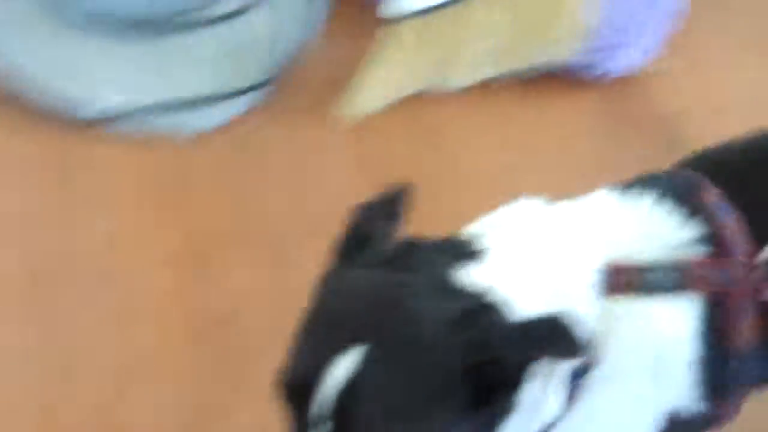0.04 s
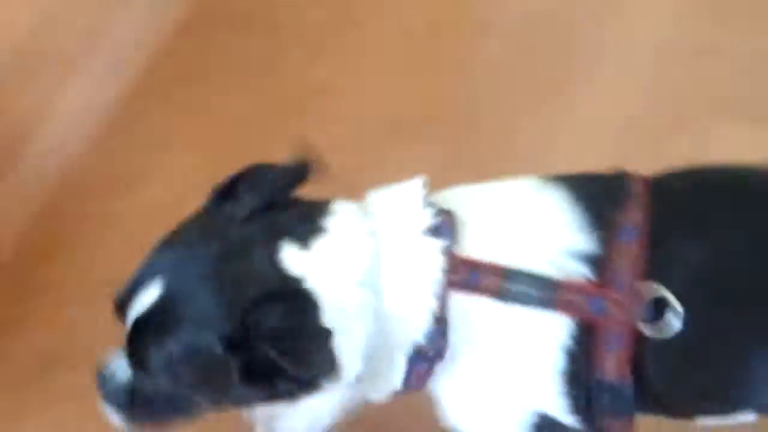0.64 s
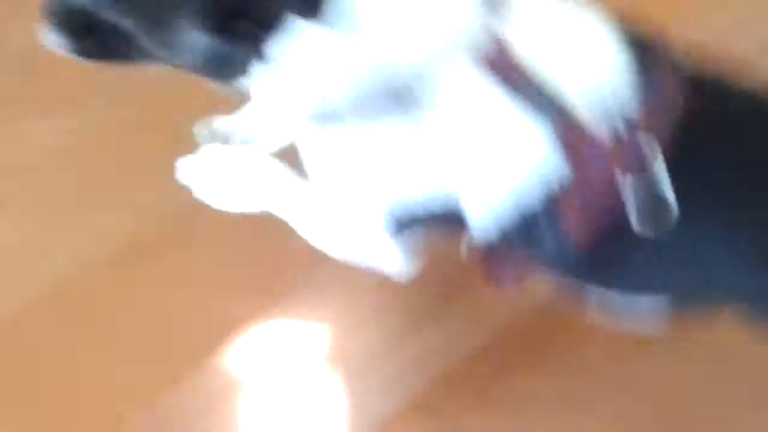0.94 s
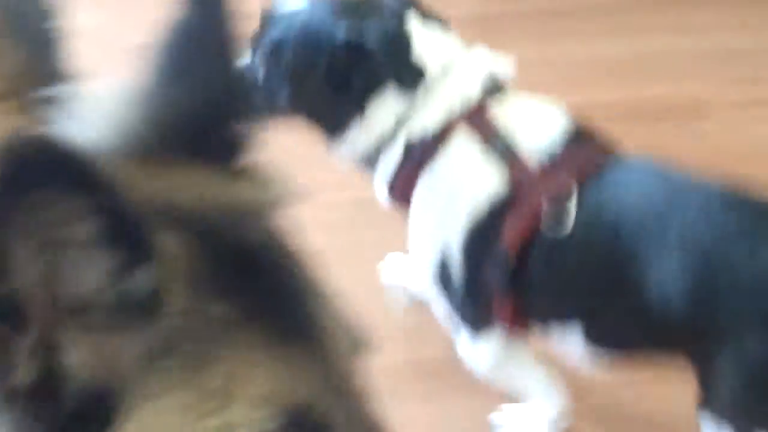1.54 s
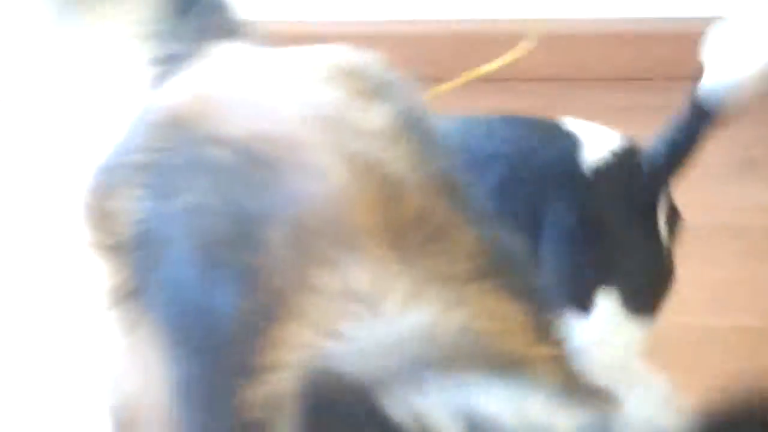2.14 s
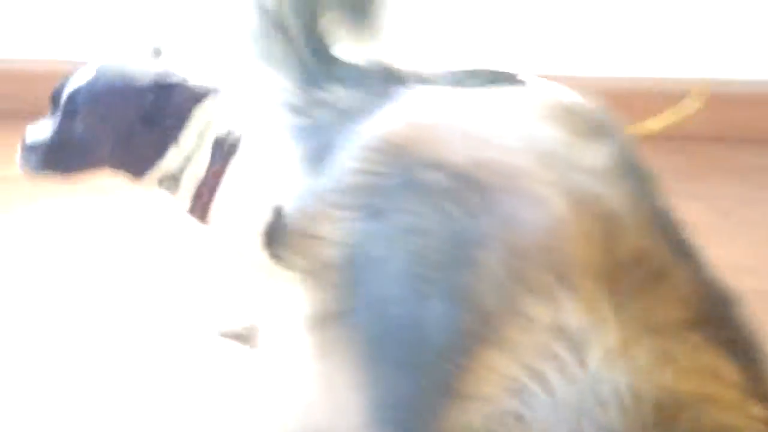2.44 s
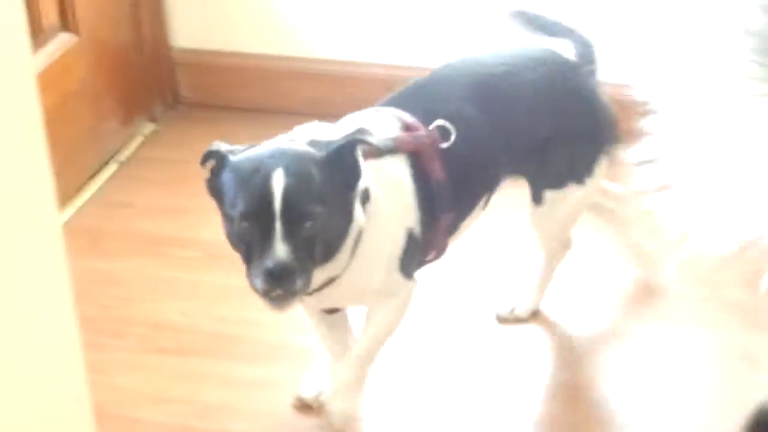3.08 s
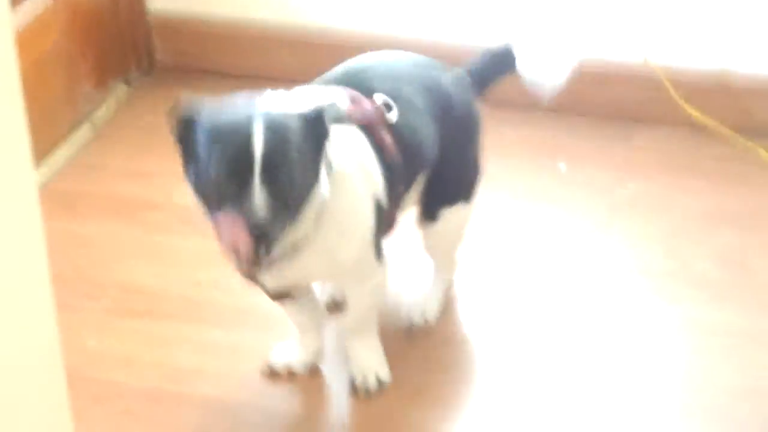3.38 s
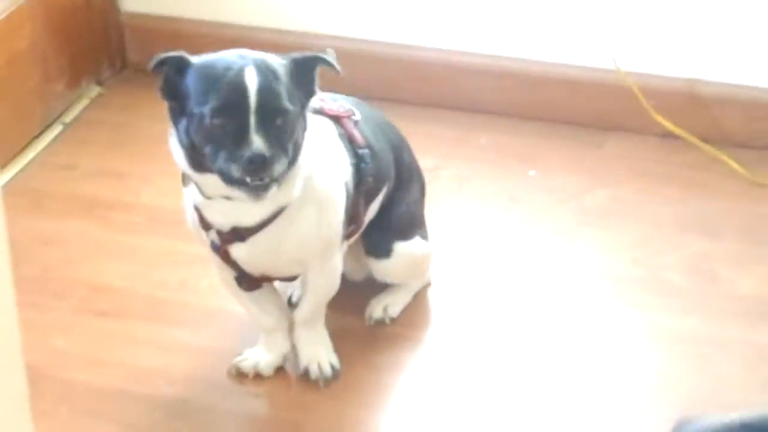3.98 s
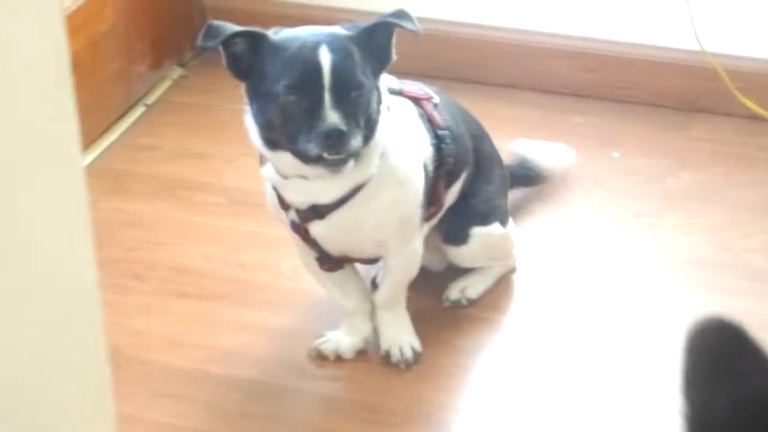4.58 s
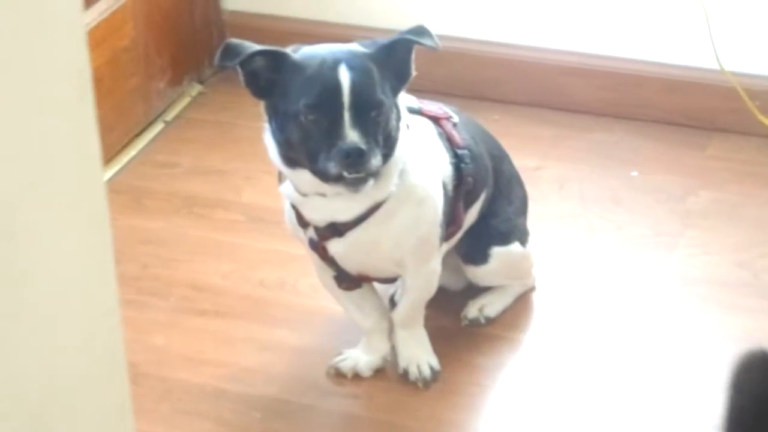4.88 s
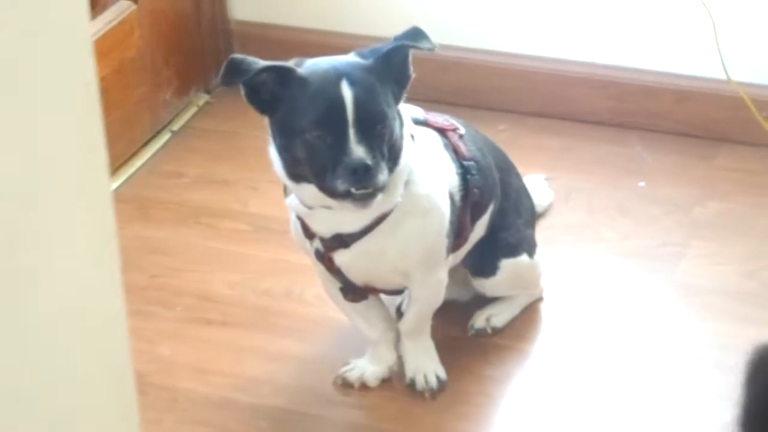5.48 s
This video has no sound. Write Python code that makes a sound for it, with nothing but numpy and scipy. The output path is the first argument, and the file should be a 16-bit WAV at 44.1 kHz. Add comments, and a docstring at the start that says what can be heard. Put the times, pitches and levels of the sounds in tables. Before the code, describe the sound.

Quick claw ticks, scrapes and soft paw thumps cross wooden boards in a bare room, then die away.

```python
"""Small dog on a wooden floor

A small dog prances in a bare room, walks a little way off and sits. Pads thump the boards; claws skid in, tick
two to a paw, and sometimes clack or slide on. The ceiling throws each tick back once before the room rings out.
The harness ring clinks, a nose or paw squeaks and the tail brushes the wood, over a low sway of the floor and a
faint bed of rumble and hiss."""
import sys
import numpy as np
from scipy import signal
from scipy.fft import rfft, irfft
from scipy.io import wavfile

SR = 44100
rng = np.random.default_rng(int(sys.argv[2]) if len(sys.argv) > 2 else 0)


def log_audio(samples):
    """Write samples as a 16-bit WAV file to the path given in sys.argv[1]."""
    # one column per channel
    frames = np.atleast_2d(samples).T
    # limit to full scale, then quantise
    limited = np.clip(frames, -1, 1)
    pcm = np.round(limited * 32767).astype(np.int16)
    wavfile.write(sys.argv[1], SR, pcm)


N = 247801

# faint rumble and hiss underneath: f/Hz, relative level/dB
AIR_TONE = [(12, -37), (20, -1.5), (71, -7), (170, -9), (270, -12), (302, -8.5), (365, -13), (632, -15),
            (928, -16.5), (1190, -19), (3270, -25.5), (3650, -24.5), (14000, -28)]
# stereo width of that noise: f/Hz, side minus mid/dB
AIR_SPREAD = [(30, -6), (90, -7), (700, -4.5), (1500, -3), (2500, -3.5), (5000, 0), (14000, 0)]
# colour of the reverb: f/Hz, relative level/dB
REVERB_TONE = [(100, -6), (350, -2), (1000, -4), (2000, -1.5), (4000, -1), (6500, -1), (10000, -0.5),
               (14000, 0.5)]
# decay of the reverb by band: f/Hz, t60/s
REVERB_DECAY = [(300, 0.43), (800, 0.56), (2100, 0.44), (5500, 0.42), (13000, 0.27)]
# stereo width of the reverb: f/Hz, side minus mid/dB
REVERB_SPREAD = [(70, 4), (180, -11), (350, -27), (700, -22), (1300, -18), (2400, -50), (4400, -9),
                 (8000, -3.5), (14000, 0.5)]
# weight shifting on the floor: t/s, peak level/dB
WEIGHT_SHIFTS = [(2.56, -51), (2.77, -52), (2.89, -45), (3.18, -52.5), (3.34, -51.5), (3.518, -42),
                 (3.94, -54)]
# the wagging tail brushing the floor: t/s, length/s, f/Hz, energy/dB
TAIL_SWEEPS = [(4.056, 0.17, 960, -26.5), (4.546, 0.094, 1200, -31), (5.097, 0.13, 794, -32)]
# thin squeaks from the nose or a paw: t/s, length/s, f/Hz, energy/dB
THIN_SQUEAKS = [(1.904, 0.029, 4520, -29), (2.974, 0.011, 4250, -24.5), (3.439, .02, 3590, -30),
                (3.561, 0.057, 5310, -28), (3.722, 0.04, 5400, -32), (3.783, 0.044, 6100, -34),
                (3.847, 0.039, 5240, -21.5), (4.01, 0.043, 5050, -25.5), (4.026, 0.044, 5735, -27)]
# knocks on the harness ring: t/s, energy/dB
HARNESS_HITS = [(2.133, -18.5), (3.619, -27)]
# modes of the harness ring: f/Hz, relative level/dB, t60/s
HARNESS_MODES = [(3300, -7.5, 0.14), (3880, -3, 0.076), (7400, -19.5, 0.071), (9700, -13, .2),
                 (10150, -31, .25), (10800, -6, 0.27), (11360, -2.5, 0.16), (13400, -32, .2)]
# modes of a board under a pad, at pitch ratio 1: f/Hz, relative level/dB, t60/s
BOARD_MODES = [(124.3, -23, 0.28), (269, -8.5, 0.038), (327, 4, 0.041), (368.6, -1.5, 0.049),
               (450, -5, 0.018), (860, -9.5, .02)]
# a heavy pad presses longer and sounds lower: pad energy/dB, pitch ratio
PITCH_BY_WEIGHT = [(-21, 1.134), (-13, 0.955)]
# claws sliding over the varnish: t/s, length/s, energy/dB, brightness/dB
CLAW_DRAGS = [(.513, 0.018, -18, -2), (0.558, 0.036, -12, -9), (.88, 0.031, -7, 0.5),
              (1.045, 0.022, -20.5, -1.5), (1.12, 0.078, -22, -3), (1.43, 0.047, -10.5, 2),
              (1.595, 0.042, -6.5, 1.5), (1.782, 0.036, -7, -0.5), (1.995, 0.041, -14, -1),
              (2.194, .02, -13, 1), (2.249, 0.059, -11, -1.5), (2.547, 0.021, -20, -3),
              (2.781, 0.0089, -15, 6), (2.875, 0.02, -21, -3), (2.942, 0.089, -20.5, -1),
              (3.308, 0.03, -3.5, -0.5), (3.402, 0.17, -30, -3), (3.74, 0.044, -26.5, -1.5),
              (3.864, 0.04, -21, -2), (3.916, .016, -20, -6.5), (4.591, 0.063, -29.5, 6)]
# claws landing side-on: t/s, energy/dB, pitch ratio
SIDE_HITS = [(.0162, -5.5, 1.65), (.7245, -12, 1.1), (.731, -13.5, 0.87), (1.0115, -18.5, 1),
             (1.2495, -4, 0.94), (1.458, -8, 1.026), (1.9578, -9.5, 1.15), (3.186, -27, 0.92)]
# short ring of a side-on claw, at pitch ratio 1: f/Hz, relative level/dB, t60/s
SIDE_MODES = [(3154, -0.5, 0.014), (3440, 2.5, 0.013), (4090, -1, 0.018), (4820, -2, 0.0083)]
# colour of a claw on varnish: f/Hz, relative level/dB
CLAW_SPECTRUM = [(100, -27.5), (400, -8), (900, -12), (1600, -11), (2400, -6.5), (3100, -4.5), (4300, -1.5),
                 (5600, -1.5), (8000, -1), (11000, 0), (13500, -0.5), (16000, -23.5)]
# how hollow the boards under the dog are: t/s, knock over strike/dB
HOLLOWNESS = [(0, -18), (.9, -18.5), (1.2, -29.5), (4, -29)]
# the dog's body screening its paws: t/s, reverb send over direct tick/dB
BODY_SCREEN = [(0, 4), (.55, 6.5), (.8, 1.5), (1.24, -6.5), (1.39, 2), (1.6, 0), (3.6, 0)]
# paw falls: t/s, claw energy/dB, brightness/dB, skid energy/dB, pad energy/dB
PAW_FALLS = [(0.0147, -3.5, 12.5, -15, -13.5), (0.2182, -8, 10.5, -16, -16.5), (.311, -39, -1, -36, -17),
             (0.3754, -3.5, 15, -29, -18.5), (0.5561, -9, 15.5, -27, -20.5), (0.7201, -3, 19, -14, -11),
             (0.8694, -13, 6, -13.5, -16), (.997, -24, -2, -17, -11.5), (1.032, -26, 0, -24, -9.5),
             (1.2031, -8.5, 16, -11, -33), (1.2442, 8, 26.5, -24, -20), (1.3894, -4, 10.5, -39, -46),
             (1.4506, -7, 9.5, -13, -25.5), (1.5882, -1, 8.5, -38, -21.5), (1.761, -33, -12, -43, -16.5),
             (1.958, -8.5, 7.5, -13, -26.5), (2.1304, -15, 13, -32, -35.5), (2.2125, -11.5, 6, -18, -30),
             (2.361, -9.5, 14, -8, -36), (2.5989, -18.5, 2.5, -23.5, -36.5), (2.671, -17, 8, -11, -32),
             (2.789, -12.5, 11, -14.5, -30), (3.0446, -12.5, 3, -13, -36), (3.135, -22.5, 5, -25, -38.5),
             (3.186, -15.5, 3, -25, -38.5), (3.3094, -15.5, 9, -30, -35.5), (3.6182, -20.5, 4, -27, -39.5)]


def undb(db):
    """Decibels to gain."""
    return 10 ** (np.asarray(db) / 20)


def curve(points, x):
    """Value of a breakpoint curve at x."""
    return np.interp(x, *np.transpose(points))


def spectrum_at(points, hz):
    """Value of a breakpoint curve on a log frequency axis."""
    f, value = np.transpose(points)
    return np.interp(np.log(np.maximum(hz, 1)), np.log(f), value)


def wander(x, span, count):
    """Random curve through count points spaced evenly from 0 to span."""
    return np.interp(x, np.linspace(0, span, count), rng.standard_normal(count))


def unit(x):
    """Scale to an energy of one."""
    return x / np.sqrt(np.sum(x ** 2))


def seconds(length):
    """Time axis of a short sound."""
    return np.arange(int(length * SR)) / SR


def decay(t, t60):
    """Envelope that falls 60 dB in t60 seconds."""
    return np.exp(-np.log(1000) * t / t60)


def add(track, s, sound):
    """Mix a sound into a track at time s."""
    i = max(int(s * SR), 0)
    track[i:i + len(sound)] += sound[:N - i]


def blows(events, modes, push_s):
    """Struck modes, balanced anew at each blow; a longer push softens the attack."""
    out, t = np.zeros(N), seconds(0.3)
    for s, db, pitch in events:
        scaled_t = pitch * t  # a higher ring also dies sooner
        ring = sum(undb(level + rng.normal(0, 2.7)) * np.sin(2 * np.pi * hz * scaled_t)
                   * decay(scaled_t, t60) for hz, level, t60 in modes)
        attack = 1 - np.exp(-t / push_s)
        add(out, s, undb(db) * unit(ring * attack))
    return out


def diffuse(tone, spread, size):
    """Frequencies, and the left and right spectra of noise that arrives from all sides."""
    hz = np.fft.rfftfreq(size, 1 / SR)
    mid, side = rfft(rng.standard_normal((2, size)))
    width = undb(spectrum_at(spread, hz))
    stereo = (mid + np.array([[1], [-1]]) * width * side) / np.sqrt(1 + width ** 2)
    return hz, undb(spectrum_at(tone, hz)) * stereo


def noise_bed(level_db=-55.5):
    """A bed of faint rumble and hiss, wavering slightly."""
    _, spectra = diffuse(AIR_TONE, AIR_SPREAD, size=2 ** 18)
    noise = irfft(spectra)[:, :N]
    waver_db = 0.5 * wander(np.arange(N), N, count=30)
    return noise / noise.std() * undb(level_db + waver_db)


def room_response(build_s=0.00054):
    """Dense reflections off bare walls; the treble dies first."""
    t = np.arange(24576) / SR
    hz, spectra = diffuse(REVERB_TONE, REVERB_SPREAD, size=len(t))
    out = 0
    for centre, t60 in REVERB_DECAY:
        band = spectrum_at([(f, f == centre) for f, _ in REVERB_DECAY], hz)
        out = out + irfft(spectra * band) * decay(t, t60)
    return np.sqrt(2) * unit(out * (1 - np.exp(-t / build_s)))


def reverb(send, crossfades=14):
    """As the dog moves about, one pattern of reflections fades into the next."""
    out, hop = np.zeros((2, N)), N // crossfades
    for start in range(-hop, N - hop // 2, hop):
        i = np.arange(max(start, 0), min(start + 2 * hop, N))
        faded = send[i] * np.sin(np.pi * (i - start) / (2 * hop))
        for channel, response in zip(out, room_response()):
            add(channel, i[0] / SR, signal.fftconvolve(faded, response))
    return out


def floor_boom(hz=46, rise_s=0.039):
    """The whole floor swings slowly under a shifting weight."""
    out, t = np.zeros(N), seconds(0.4)
    swell = t / rise_s * np.exp(1 - t / rise_s)
    for s, db in WEIGHT_SHIFTS:
        detune = 1 + 0.032 * rng.standard_normal()
        add(out, s, undb(db) * swell * np.sin(2 * np.pi * hz * detune * t))
    return out


def tail_swishes():
    """Fur sweeping over wood: a soft swell of dull noise."""
    out = np.zeros(N)
    for s, length, hz, db in TAIL_SWEEPS:
        t = seconds(length)
        fur = signal.lfilter(*signal.iirpeak(hz, Q=1.5, fs=SR), rng.standard_normal(len(t)))
        add(out, s, undb(db) * unit(fur * np.sin(np.pi * t / length)))
    return out


def squeaks():
    """Thin, unsteady whistles from the nose or a paw, with a slight arch in pitch."""
    out = np.zeros(N)
    for s, length, hz, db in THIN_SQUEAKS:
        t = seconds(length)
        arch = np.sin(np.pi * t / length)
        waver = wander(t, length, count=12)
        pitch_hz = hz * (1 + 0.012 * (arch - 1) + 0.0074 * waver)
        whistle = np.sin(2 * np.pi * np.cumsum(pitch_hz) / SR)
        add(out, s, undb(db) * unit(arch * undb(3.9 * waver) * whistle))
    return out


def harness_clinks():
    """A hard tap sets the harness ring chiming."""
    return blows([(s, db, 1) for s, db in HARNESS_HITS], HARNESS_MODES, push_s=0.0003)


def pad_thumps(lead_s=0.015, stamp_db=23, heel_s=0.022, heel_db=-7, heel_ratio=1.12):
    """Toes, then heel, thump the boards, each on a slightly different spot."""
    hits = []
    for s, claw_db, _, _, db in PAW_FALLS:
        # the pad touches first, unless the claws stamp down at least stamp_db louder
        touch = s - lead_s * np.clip(1 - (claw_db - db) / stamp_db, 0, 1)
        toe_pitch, heel_pitch = curve(PITCH_BY_WEIGHT, db) * np.exp(0.036 * rng.standard_normal(2))
        hits += [(touch, db, toe_pitch), (touch + heel_s, db + heel_db, heel_pitch * heel_ratio)]
    return blows(hits, BOARD_MODES, push_s=0.0028)


def chatter(envelope, spread_db):
    """Force of tiny slips of very unequal size, too irregular to favour any pitch."""
    n = len(envelope)
    slips = rng.standard_normal(n) * envelope
    slips *= undb(spread_db * np.minimum(rng.exponential(size=n), 5))
    spectrum = rfft(slips, 2 * n)
    magnitude = np.abs(spectrum)
    whitened = spectrum / np.sqrt(magnitude * magnitude.clip(0.5 * magnitude.mean()))
    return unit(irfft(whitened)[:n])


def claw_contact(force, bright_db, clack_hz=3850, clack_width_hz=1500, size=512):
    """Horn on varnish colours a force: bright on the tip, clacky when the claw lies flat."""
    hz = np.fft.rfftfreq(size, 1 / SR)
    octaves = np.log2(np.clip(hz, 2500, 12000) / 6000)
    db = spectrum_at(CLAW_SPECTRUM, hz) + 0.84 * bright_db * octaves
    # every claw and every spot on the boards has its own clack and broad resonances
    peak_hz = clack_hz * np.exp(0.12 * rng.standard_normal())
    peak_db = 8.5 * np.clip(0.6 - bright_db / 10, 0, 1)
    db += peak_db / (1 + ((hz - peak_hz) / (clack_width_hz / 2)) ** 2)
    db += 1.7 * wander(hz, SR / 2, count=22)
    # minimum phase keeps the attack crisp
    cepstrum = irfft(np.log(undb(db)))
    cepstrum[1:size // 2] *= 2
    cepstrum[size // 2 + 1:] = 0
    response = irfft(np.exp(rfft(cepstrum)))
    return unit(signal.fftconvolve(force, response))


def claw_scrapes(walk_from_s=1.9, shuffle_until_s=3.4, shuffle_count=12):
    """Sliding claws stick and slip in short, grainy bursts."""
    # each paw skids in; at a walk it scuffs again as it takes the weight (columns as in CLAW_DRAGS)
    skids = [(s - 0.008, 0.018, db, 0) for s, _, _, db, _ in PAW_FALLS]
    scuffs = [(s + 0.036, 0.034, db - 11.5, 0) for s, db, *_ in PAW_FALLS if s > walk_from_s]
    # the other paws shuffle faintly
    shuffles = [(shuffle_until_s * (k + rng.random()) / shuffle_count, 0.026, rng.normal(-20, 0.5), 0)
                for k in range(shuffle_count)]
    out = np.zeros(N)
    for s, length, db, bright_db in skids + scuffs + shuffles + list(CLAW_DRAGS):
        swell = np.sqrt(np.sin(np.pi * (seconds(length) / length) ** 0.91))
        force = chatter(swell, spread_db=3.5)
        add(out, s, undb(db) * claw_contact(force, bright_db))
    return out


def claw_clacks():
    """A claw lands side-on and rings very briefly."""
    return blows(SIDE_HITS, SIDE_MODES, push_s=0.0003)


def board_knock(force):
    """The dry, woody answer of a board to a claw."""
    return unit(signal.sosfilt(signal.butter(2, [700, 2300], "band", fs=SR, output="sos"), force))


def claw_strikes(next_s=0.004, next_db=-12.5):
    """One claw strikes and its neighbour follows softly: t/s, energy/dB, brightness/dB."""
    strikes = []
    for s, db, bright_db, _, _ in PAW_FALLS:
        lag = next_s * np.exp(0.2 * rng.standard_normal())
        strikes += [(s, db, bright_db), (s + lag, db + next_db, 0.1 * bright_db)]
    return strikes


def claw_ticks(ceiling_s=0.015, ceiling_db=-6.5):
    """Each claw snaps and chatters for a few ms; returns ticks with ceiling slap, and a reverb send."""
    ticks, send = np.zeros((2, N))
    t = seconds(0.014)
    snap = np.exp(-t / 0.00011) * (1 - np.exp(-t / 0.0001))
    low_cut = signal.butter(2, 2800, "high", fs=SR)  # a tiny tip radiates little bass
    for s, db, bright_db in claw_strikes():
        # a firm tip gives one bright snap; a light or flat landing chatters more
        chatter_db = np.clip(-12.5 - 0.45 * bright_db - 0.74 * db, -18, -1)
        force = chatter(snap + undb(chatter_db) * np.exp(-t / 0.0018), spread_db=1)
        tick = undb(db) * claw_contact(signal.lfilter(*low_cut, force), bright_db - 5)
        add(ticks, s, tick)
        add(ticks, s + ceiling_s, undb(ceiling_db) * tick)
        # the boards radiate a duller sound into the room than the tip sends upward
        dull_tick = claw_contact(force, 0.4 * bright_db - 4.5)
        add(send, s, undb(db + curve(BODY_SCREEN, s)) * dull_tick)
        add(send, s, undb(db + curve(HOLLOWNESS, s)) * board_knock(force))
    return ticks, send


def place_right(x, shift_samples=0.24):
    """Direct sound reaches the right channel a fraction of a sample early, the left as much late."""
    return x + np.array([[-1], [1]]) * shift_samples * np.gradient(x)


def scene():
    """Paws, harness and squeaks feed the reverb; tail and floor boom stay dry; air lies underneath."""
    ticks, tick_send = claw_ticks()
    scrapes, whistles = claw_scrapes(), squeaks()
    pads, clacks, clinks = pad_thumps(), claw_clacks(), harness_clinks()
    direct = ticks + scrapes + pads + clacks + clinks + whistles + tail_swishes() + floor_boom()
    send = (tick_send + undb(0.5) * (scrapes + pads) + undb(-5.5) * clacks
            + undb(-4) * clinks + undb(-0.5) * whistles)
    return place_right(direct) + reverb(send) + noise_bed()


def record(dry):
    """The right channel is slightly more sensitive; a steep low-pass takes off the very top."""
    sensitivity = undb([[-0.4], [0.4]])
    high_cut = signal.ellip(8, 0.2, 60, 14150, fs=SR, output="sos")
    return signal.sosfilt(high_cut, sensitivity * dry)


dry = scene()
out = record(dry)
log_audio(out)
```